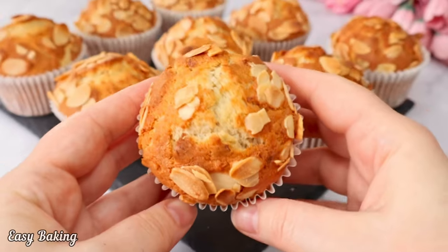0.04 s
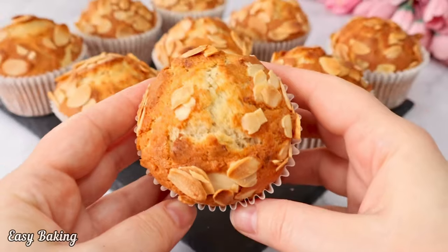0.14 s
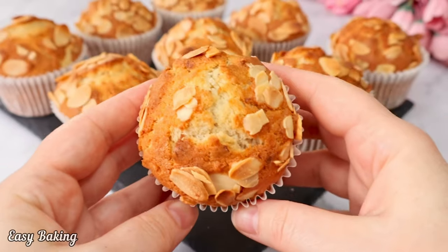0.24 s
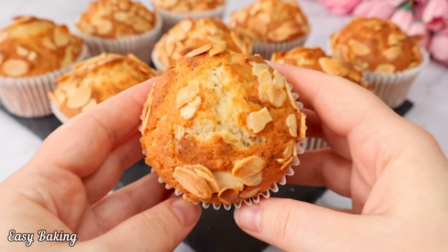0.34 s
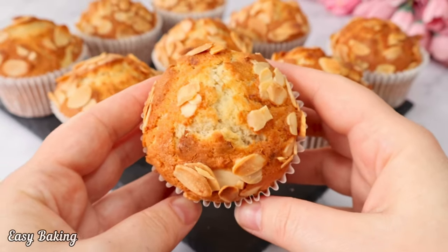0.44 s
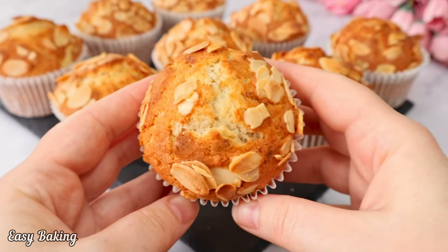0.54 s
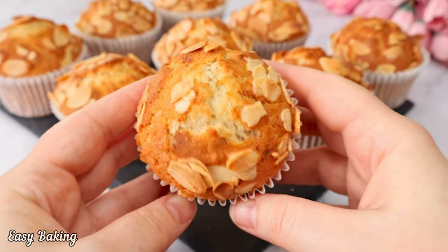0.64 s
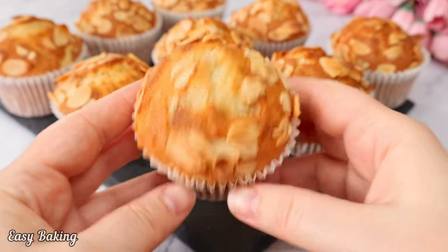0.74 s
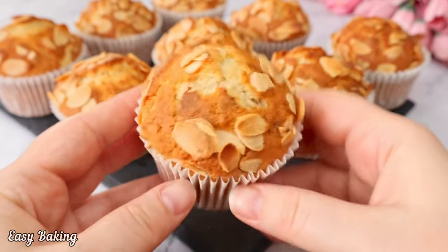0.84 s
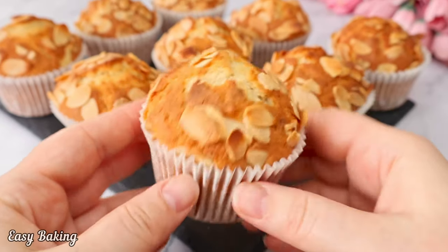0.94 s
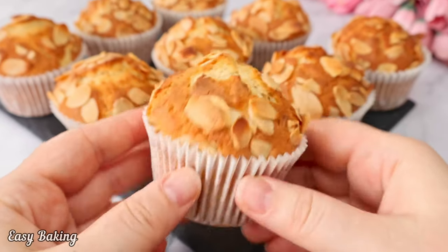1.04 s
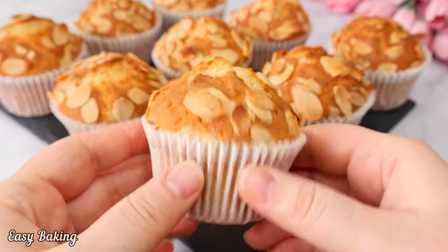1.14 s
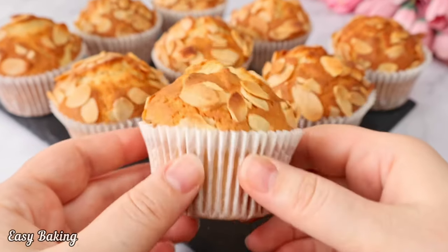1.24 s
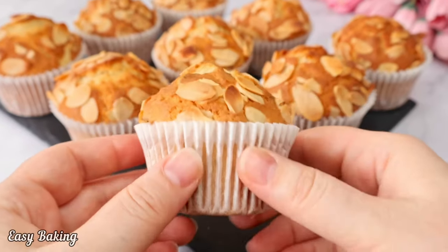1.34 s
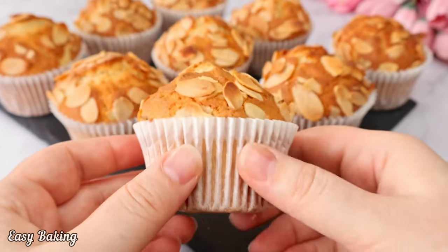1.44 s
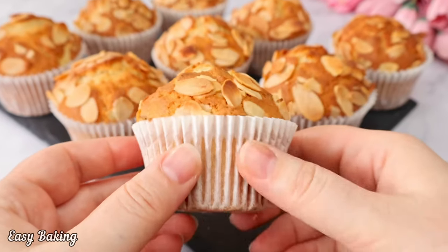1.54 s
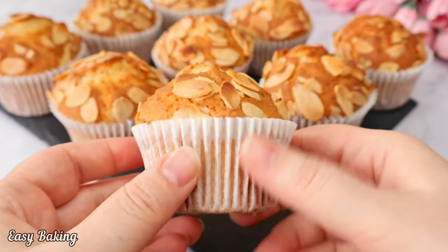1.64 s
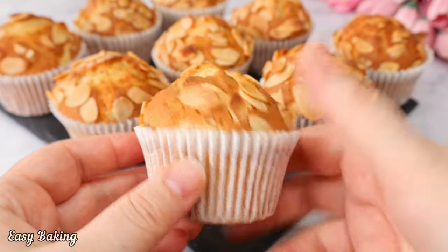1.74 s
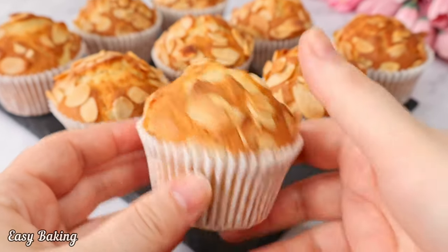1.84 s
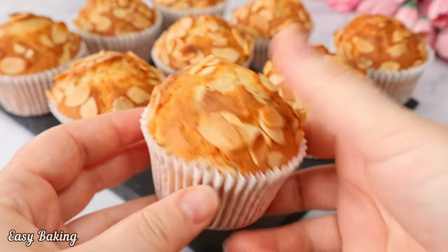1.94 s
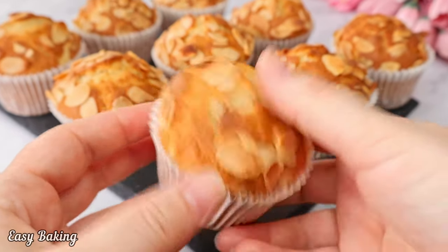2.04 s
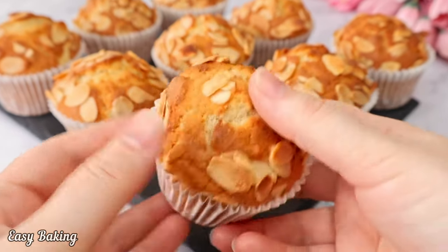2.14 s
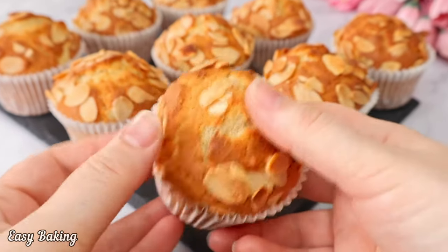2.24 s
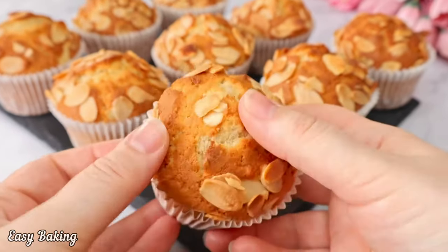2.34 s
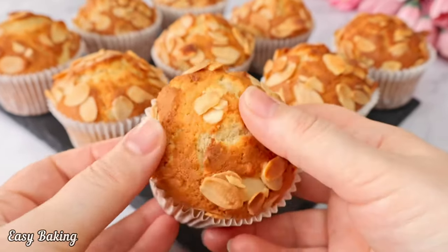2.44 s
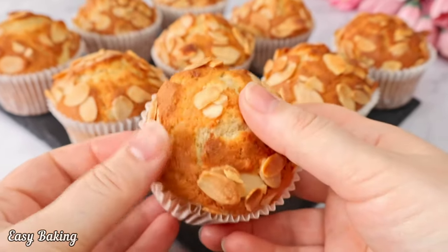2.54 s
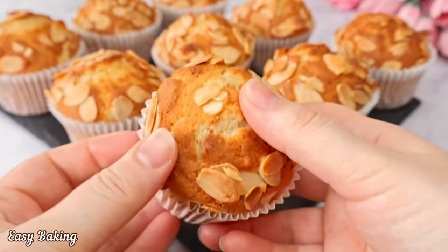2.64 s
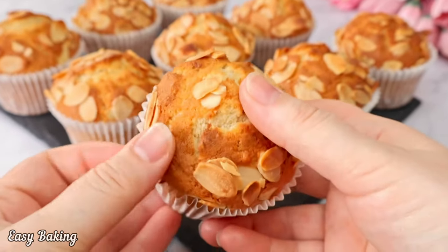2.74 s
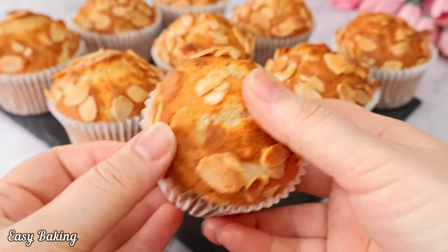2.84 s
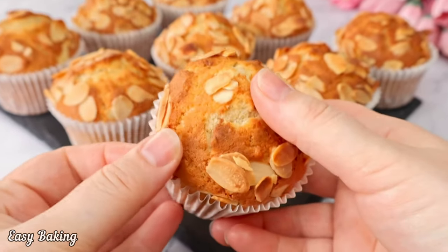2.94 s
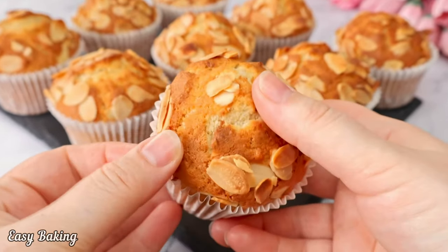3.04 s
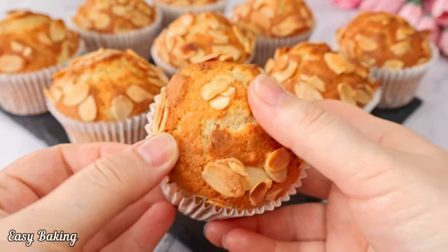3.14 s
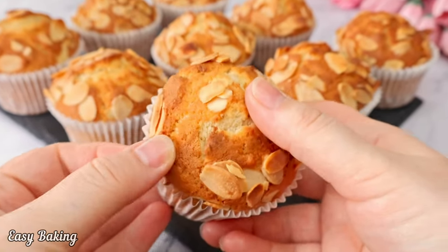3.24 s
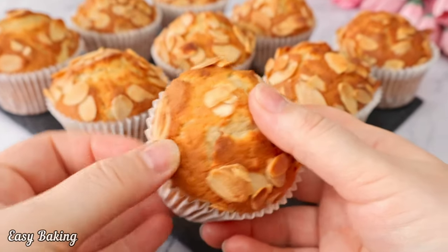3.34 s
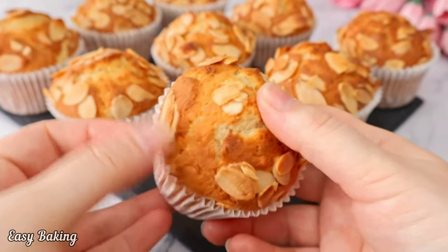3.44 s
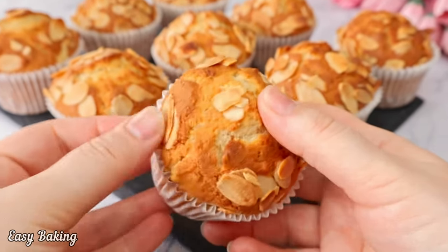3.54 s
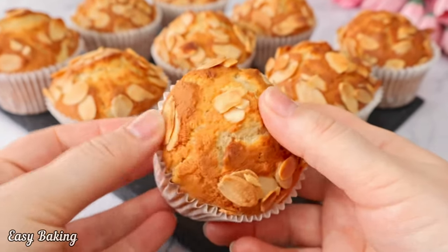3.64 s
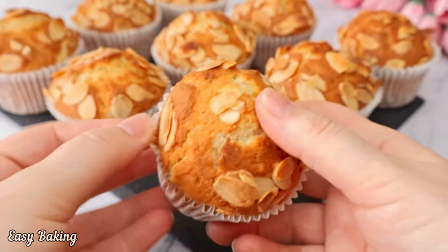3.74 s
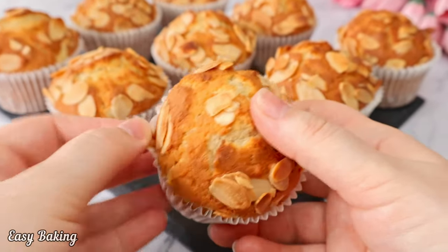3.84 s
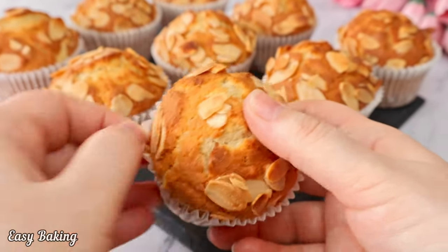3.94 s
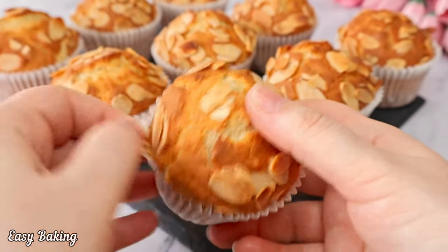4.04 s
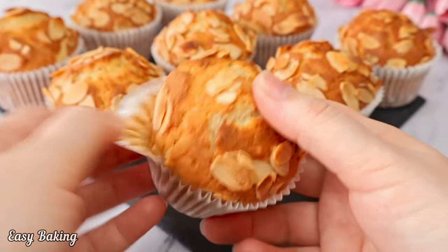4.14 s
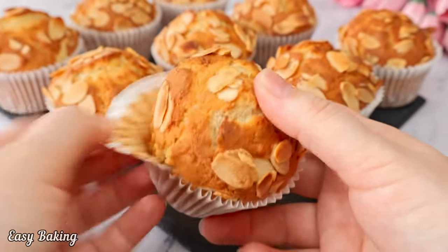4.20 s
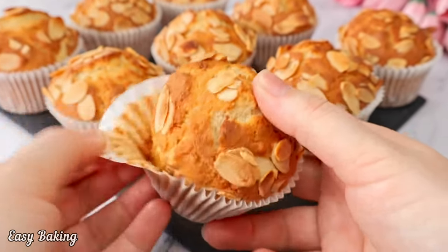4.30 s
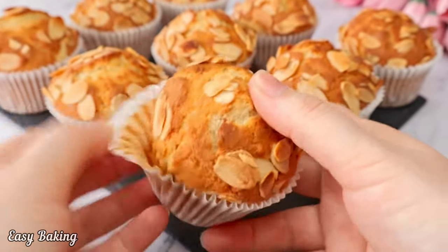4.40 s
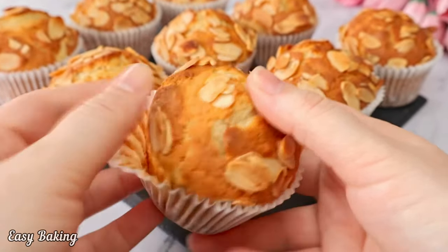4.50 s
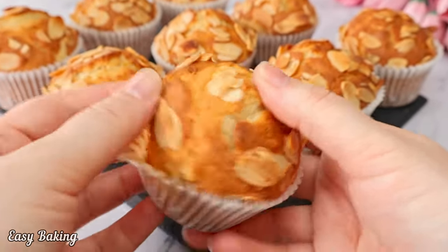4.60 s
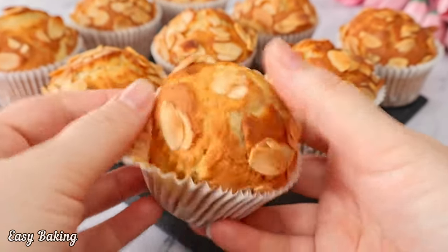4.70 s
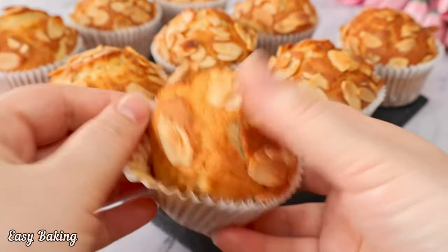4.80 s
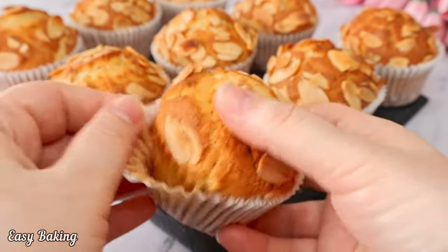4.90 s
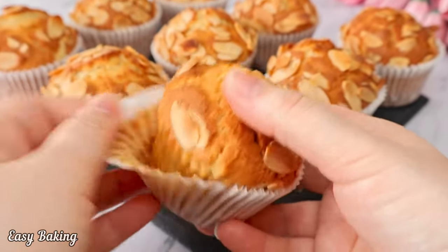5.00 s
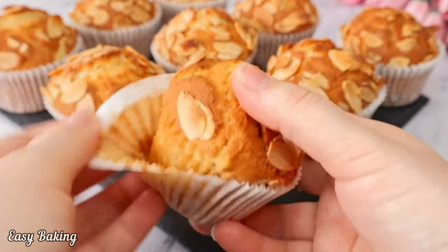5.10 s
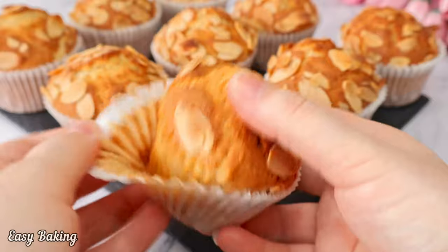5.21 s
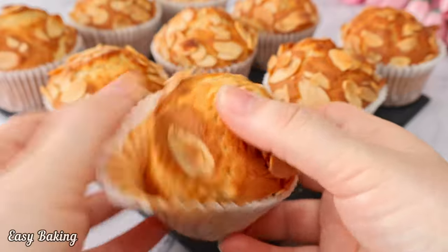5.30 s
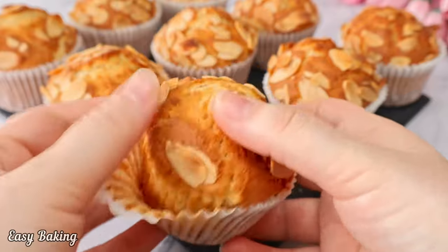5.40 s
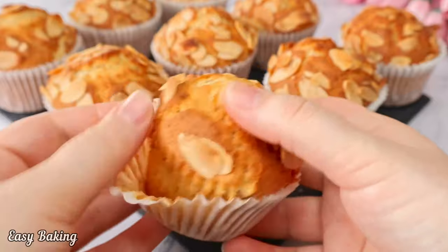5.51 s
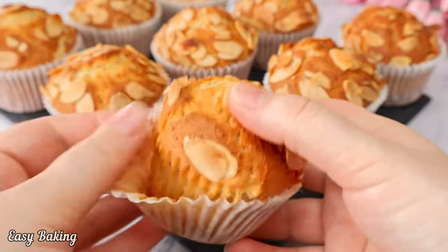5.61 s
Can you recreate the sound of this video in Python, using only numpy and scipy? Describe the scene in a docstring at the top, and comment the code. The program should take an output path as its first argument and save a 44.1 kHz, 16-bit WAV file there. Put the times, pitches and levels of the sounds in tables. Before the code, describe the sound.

Faint bird chirps and soft finger rubs, then a paper baking case crackles and snaps as it is peeled off a muffin.

```python
"""Hands turn a muffin and peel its pleated paper case, close to the microphone in a quiet room. First, over a
low rumble and hiss, small birds chirp faintly with a long echo, while fingers press the cake and rub the paper
in short strokes of stick-slip friction. The birds stop and a faint hum swells. From about 3.8 s the paper peels
off the crumb in grainy pulls, and pleats snap as they buckle and come unstuck. A thumb rasps over the crust and
the hum fades; a short scratch and a few last snaps follow."""
import sys
import numpy as np
from scipy import signal
from scipy.fft import rfft, irfft
from scipy.io import wavfile
from scipy.ndimage import uniform_filter1d

SR = 44100
rng = np.random.default_rng(int(sys.argv[2]) if len(sys.argv) > 2 else 0)


def dump_mix(stems):
    """Bounce the given channels to the path in sys.argv[1] as a 16-bit WAV at rate SR."""
    frames = np.atleast_2d(stems).T  # one column per channel
    limited = np.clip(frames, -1, 1)  # hard clip at full scale
    pcm = np.round(limited * 32767).astype(np.int16)
    wavfile.write(sys.argv[1], SR, pcm)


N = 249606


def gain_of(db):
    """Amplitude ratio of a level in decibels."""
    return 10 ** (np.asarray(db) / 20)


def unit_rms(x):
    """Normalisation to an rms of 1."""
    return x / np.sqrt(np.mean(x ** 2) + 1e-20)


def curve_at(points, hz):
    """Interpolation of (frequency, value) points on a logarithmic frequency axis."""
    f, value = np.transpose(points)
    return np.interp(np.log(hz + 1), np.log(f + 1), value)


def add(mix, start, sound):
    """Superposition of a sound on the mix at a start time in seconds."""
    part = mix[..., max(round(start * SR), 0):][..., :sound.shape[-1]]
    part += sound[..., :part.shape[-1]]


def reverberation(x, t60s, gap_s, correlation, size):
    """Reverberation: sparse reflections of random sign decay exponentially, each band at its own rate."""
    taps = rng.choice([-1., 1.], (2, size)) * (rng.random((2, size)) < .15)
    taps[:, :int(gap_s * SR)] = 0
    hz, t, spectra = signal.stft(taps, SR, nperseg=256)
    decay = gain_of(-60 * t / curve_at(t60s, hz)[:, None])
    mid, side = signal.istft(spectra * decay, SR)[1]
    side = side * np.sqrt((1 - correlation) / (1 + correlation))
    tail = np.array([mid + side, mid - side])
    return signal.fftconvolve(x[None], tail / np.linalg.norm(tail[0]), axes=1)[:, :len(x)]


# spectrum of the background: (frequency [Hz], relative spectral density [dB])
NOISE_SPECTRUM = [(6, -7.5), (15, 0.5), (25, -8), (38, -16.5), (52, -17.5), (64, -14.5), (82, -23),
                  (180, -22.5), (350, -22.5), (540, -23.5), (1300, -27), (2500, -30.5), (4000, -32),
                  (5500, -34.5), (15800, -39)]
# likeness of its left and right channels: (frequency [Hz], correlation [0-1])
NOISE_CORRELATION = [(30, 0.91), (100, 0.92), (250, 0.8), (500, 0.54), (2000, 0.32), (5000, 0.91),
                     (9000, 1), (15000, 1)]

def background(level_db=-52):
    """Partially coherent noise: a steady low rumble and soft hiss in two channels."""
    hz = np.fft.rfftfreq(N, 1 / SR)
    left, independent = rfft(rng.standard_normal((2, N)))
    correlation = curve_at(NOISE_CORRELATION, hz)
    right = correlation * left + np.sqrt(1 - correlation ** 2) * independent
    spectra = np.array([left, right]) * gain_of(curve_at(NOISE_SPECTRUM, hz))
    return gain_of(level_db) * unit_rms(irfft(spectra, N))


# swell of a faint hum in the room: (time [s], level [dB])
HUM_SWELL = [(3.4, -83), (3.9, -65.5), (4.7, -62), (5.1, -82)]

def hum(centre_hz=352, width_hz=110):
    """Narrow-band noise: neighbouring frequencies beat, so the hum wavers."""
    hz = np.fft.rfftfreq(N, 1 / SR)
    band = irfft(rfft(rng.standard_normal(N)) / (1 + (2 * (hz - centre_hz) / width_hz) ** 2), N)
    level_db = np.interp(np.arange(N) / SR, *np.transpose(HUM_SWELL))
    return gain_of(level_db) * unit_rms(band)


def bird_note(length, first_hz, last_hz, db, rough, ease=0.318, waver_hz=170, flutter_db=2, trill_hz=48):
    """Frequency and amplitude modulation of a phasor: a gliding whistle that wavers and throbs if rough."""
    u = np.linspace(0, 1, int(length * SR))
    waver, flutter = rng.standard_normal((2, SR // 2))
    hz = first_hz + (last_hz - first_hz) * (u + ease * u * (1 - u))  # starts fast and settles
    hz = hz + waver_hz * rough * unit_rms(uniform_filter1d(waver, size=70))[:len(u)]
    level = gain_of(db + flutter_db * unit_rms(uniform_filter1d(flutter, size=900))[:len(u)])
    fade = signal.windows.tukey(len(u), min(0.018 / length, .6))
    trill = 1 + min(2 * rough, .5) * np.sin(2 * np.pi * trill_hz * length * u)
    return np.sqrt(2) * level * fade * trill * np.exp(2j * np.pi * np.cumsum(hz) / SR)


# thin, high calls: (time [s], duration [s], starting pitch [Hz], level [dB])
BIRD_CALLS = [(0.383, 0.095, 8690, -53), (0.474, .09, 8230, -50), (.644, 0.06, 7370, -50),
              (0.701, .11, 8220, -48.5), (0.9, .043, 7050, -54.5), (0.929, .12, 8210, -50)]
# held whistles: (time [s], duration [s], starting pitch [Hz], final pitch [Hz], level [dB], roughness [0-1])
BIRD_WHISTLES = [(-.16, .17, 4270, 4220, -54, .4), (-.14, .12, 3960, 3450, -54.5, 0.66),
                 (1.03, 0.11, 2760, 2890, -57.5, 0), (1.235, 0.11, 2840, 2920, -54.5, .05),
                 (1.87, 0.097, 2440, 2680, -60.5, .5), (2.068, 0.049, 3350, 3500, -50.5, .8),
                 (2.10, 0.25, 3360, 3317, -51, 0.11), (2.365, 0.188, 4430, 4362, -50, .26),
                 (2.55, .12, 4560, 4485, -59, .25), (2.59, .089, 4120, 4110, -57.5, 0.21),
                 (2.67, 0.098, 3260, 3175, -56.5, 0.13), (2.70, .076, 5450, 5050, -62, .5),
                 (2.93, 0.039, 3990, 3980, -51.5, .2), (2.97, .05, 3550, 3470, -59, .3)]
# quick chirps: (time [s], starting pitch [Hz], final pitch [Hz], level [dB])
BIRD_CHIRPS = [(1.118, 4520, 4600, -55.5), (1.137, 3860, 3830, -50), (1.147, 4700, 4850, -54.5),
               (1.167, 3990, 3760, -46), (1.182, 3930, 2930, -52), (1.223, 2280, 2600, -58),
               (1.252, 3180, 3380, -47.5), (1.27, 3400, 2600, -48), (1.488, 4160, 4070, -56),
               (1.496, 2930, 2310, -53), (1.538, 2347, 3300, -52.5), (1.553, 3500, 2380, -53.5),
               (1.594, 4050, 4110, -60), (1.635, 3610, 2380, -55), (2.522, 3700, 4000, -48.5)]
# each bird's register and perch: (pitch [Hz], direct path gain [dB], left minus right [dB])
BIRD_PERCHES = [(2800, 3, 13), (3350, 0.5, 13), (3840, 2.5, 3.5), (4400, 2, 4), (7400, -6, 9)]
# decay in the birds' surroundings: (frequency [Hz], reverberation time [s])
OUTDOOR_T60 = [(2500, 1.64), (4200, 1.74), (8000, 0.78)]

def birds(level_db=-1, echo_db=-4, call_fall_hz=481, call_rough=0.29, chirp_s=0.0194, chirp_rough=0.26):
    """Level and time differences place the birds to the left; reverberation draws their notes out."""
    calls = [(s, length, hz, hz - call_fall_hz, db, call_rough) for s, length, hz, db in BIRD_CALLS]
    chirps = [(s, chirp_s, first, last, db, chirp_rough) for s, first, last, db in BIRD_CHIRPS]
    registers, paths, pans = np.transpose(BIRD_PERCHES)
    direct, sung = np.zeros((2, N + SR)), np.zeros(N + SR)  # one second of lead-in
    for start, length, first, last, db, rough in calls + list(BIRD_WHISTLES) + chirps:
        note = bird_note(length, first, last, db, rough)
        hz = (first + last) / 2
        direct_db, pan_db = np.interp(hz, registers, paths), np.interp(hz, registers, pans)
        lag_s = np.array([[0], [1.1e-5 * pan_db]])  # the sound reaches the right side later
        heard = (note * np.exp(-2j * np.pi * hz * lag_s)).imag
        add(direct, start + 1, gain_of(direct_db + np.array([[pan_db / 2], [-pan_db / 2]])) * heard)
        add(sung, start + 1, note.imag)
    echo = reverberation(sung, OUTDOOR_T60, gap_s=0.017, correlation=0.07, size=60000)
    return gain_of(level_db) * (direct + gain_of(echo_db) * echo)[:, SR:]


# soft presses on the cake: (centre time [s], duration [s], centre frequency [Hz], level [dB])
CAKE_PRESSES = [(0.662, 0.077, 190, -58.5), (0.759, 0.098, 320, -59), (2.915, .08, 420, -56.5),
                (3.585, 0.037, 335, -54), (5.274, 0.14, 248, -57.5), (5.519, 0.11, 300, -54.5)]

def presses(width_octaves=0.88):
    """Damped contact: fingers sink into the cake with a dull, brief puff and no ring."""
    out = np.zeros(N)
    for centre, length, hz, db in CAKE_PRESSES:
        size = int(length * SR)
        octaves = np.log2((np.fft.rfftfreq(size, 1 / SR) + 1) / hz)
        noise = rng.standard_normal(SR // 2)[:size]
        puff = irfft(rfft(noise) * np.exp(-(octaves / width_octaves) ** 2), size)
        add(out, centre - length / 2, gain_of(db) * unit_rms(puff) * np.hanning(size))
    return out


# envelope of a thumb's drag over the crust: (time [s], level [dB])
DRAG_ENVELOPE = [(4.63, -64), (4.67, -56), (4.71, -51), (4.75, -53), (4.80, -48), (4.89, -57), (4.93, -70)]
# resonances of that rasp: (frequency [Hz], width [Hz], relative level [dB])
DRAG_RESONANCES = [(2830, 750, 2), (6200, 1700, -8), (13900, 1100, -14)]

def finger_drag(catch_db=1.0, bump_db=2):
    """Stick-slip excitation: skin catches on the rough crust and drives a few broad resonances."""
    hz = np.fft.rfftfreq(N, 1 / SR)
    slips, grip = rng.standard_normal((2, N))
    slips *= gain_of(catch_db * unit_rms(uniform_filter1d(grip, size=150)))
    slips *= gain_of(bump_db * unit_rms(uniform_filter1d(grip[::-1], size=900)))  # bump after bump
    body = sum(gain_of(db) / np.sqrt(width) / (1 + 2j * (hz - f) / width) ** 2
               for f, width, db in DRAG_RESONANCES)
    level_db = np.interp(np.arange(N) / SR, *np.transpose(DRAG_ENVELOPE), left=-150, right=-150)
    return gain_of(level_db) * unit_rms(irfft(rfft(slips) * body, N))


def resonance(hz, centre_hz, dip_hz=None, q=.45, steepness=2.52, dip_db=-12, dip_octaves=0.36):
    """Power spectrum of a broad resonance; a fold's two faces interfere destructively around dip_hz."""
    ratio = (hz + 1) / centre_hz
    power = (1 + (q * (ratio - 1 / ratio)) ** 2) ** -steepness
    if dip_hz:
        detuning = np.log2((hz + 1) / dip_hz) / dip_octaves
        power *= 1 - (1 - gain_of(dip_db) ** 2) / (1 + detuning ** 2)
    return power / power.mean()


# resonances and antiresonances of the paper case: (frequency [Hz], gain [dB])
CASE_RESPONSE = [(60, -26), (190, -9), (380, -1.5), (540, -4), (720, -2), (1100, -0.5), (1600, 1.5),
                 (2250, -4), (2900, 1.5), (3700, -1.5), (4500, -1.5), (6100, 2.5), (8700, 2.5),
                 (11000, -3.5), (14000, 4), (16000, -8.5)]
# the hollow resonance grows as the loosened case opens: (time [s], gain [dB])
CASE_OPENING = [(4.2, 1), (4.9, 4), (5.6, 4.5)]

def paper_ring(time, crack_db, crack_hz, thump_db, dip_hz=None, thump_hz=800, size=2048):
    """Minimum-phase impulse response of the case: a bright crack, and a thump where it lies on the cake."""
    hz = np.fft.rfftfreq(size, 1 / SR)
    crack = gain_of(crack_db) ** 2 * resonance(hz, crack_hz, dip_hz)
    thump = gain_of(thump_db) ** 2 * resonance(hz, thump_hz)
    hollow_hz, width_hz = 1770, 760
    hollow_db = np.interp(time, *np.transpose(CASE_OPENING)) / (1 + (2 * (hz - hollow_hz) / width_hz) ** 2)
    log_gain = np.log(np.sqrt(crack + thump + 1e-10) * gain_of(curve_at(CASE_RESPONSE, hz) + hollow_db))
    mirrored = np.r_[log_gain, log_gain[-2:0:-1]]
    spectrum = np.exp(np.conj(signal.hilbert(mirrored)))[:len(hz)]
    return irfft(spectrum)[:size // 2]


def stroke(start, end, ring, grains_per_s, spread_db, hiss_gain, arch_db,
           build_db=-0.5, catch_db=1.5, fade_s=.012, fold_db=2.5):
    """Stick-slip friction: tiny uneven slips and hiss, swelling in clumps, ring the paper."""
    t = np.arange(start - fade_s, end + fade_s, 1 / SR)
    hiss, slip, grip, folds = rng.standard_normal((4, SR // 2))[:, :len(t)]
    chance, strength = rng.random((2, SR // 2))[:, :len(t)]
    slips = np.sign(slip) * (chance < grains_per_s / SR) * gain_of(-spread_db * np.log(strength + 0.019))
    grip = unit_rms(uniform_filter1d(uniform_filter1d(grip, size=200), size=120))
    spectrum = rfft((unit_rms(slips) + hiss_gain * hiss) * gain_of(catch_db * grip))
    # each stroke moves other folds, with small resonances of their own
    ripple = np.interp(np.linspace(0, 40, len(spectrum)), np.arange(41), folds[:41])
    drive = unit_rms(irfft(spectrum * gain_of(fold_db * ripple), len(t)))
    edge_s = np.minimum(t - t[0], t[-1] - t)
    pressure = np.sin(np.pi / 2 * np.clip(edge_s / min(2 * fade_s, end - start), 0, 1)) ** 2
    progress = np.linspace(-1, 1, len(t))
    speed = gain_of(arch_db * (1 / 3 - progress ** 2) + build_db * progress)  # fastest near mid-stroke
    return t[0], signal.fftconvolve(drive * pressure * speed, ring)


# fingers rubbing the case: (start [s], end [s], level [dB], centre frequency [Hz], thump level [dB])
FINGER_RUBS = [(.683, .742, -47, 8100, -68), (0.729, .833, -55, 9000, -60.5),
               (1.792, 1.818, -58, 4700, -68), (1.881, 1.924, -55.5, 11000, -69),
               (1.993, 2.074, -51.5, 7500, -78), (2.871, 2.945, -58.5, 12000, -61),
               (3.342, 3.385, -50, 8800, -69), (3.983, 4.03, -52.5, 10500, -62),
               (4.416, 4.464, -45, 7000, -52.5), (4.649, 4.792, -52, 6640, -57),
               (4.766, 4.867, -49, 5370, -60), (4.861, 4.906, -47.5, 2400, -60),
               (5.19, 5.299, -52.5, 3300, -54.5), (5.617, 5.72, -47, 6450, -54)]

def rubbing(level_db=-1):
    """Sliding friction: dense, even slips merge into a smooth rub as the fingers turn the muffin."""
    out = np.zeros(N)
    for start, end, db, hz, thump_db in FINGER_RUBS:
        ring = paper_ring(start, db, hz, thump_db)
        add(out, *stroke(start, end, ring, grains_per_s=1100, spread_db=1.0, hiss_gain=.9, arch_db=6))
    return gain_of(level_db) * out


# pulls on the paper: (start [s], end [s], crack level [dB], crack frequency [Hz], thump level [dB])
PEEL_PULLS = [(3.796, 3.808, -36.5, 3540, -50), (3.898, 3.945, -46.5, 5160, -62),
              (4.084, 4.19, -47, 6960, -57), (4.175, 4.237, -42.5, 6500, -48),
              (4.24, 4.282, -41.5, 6000, -48), (4.971, 5.07, -45, 5950, -55),
              (5.08, 5.125, -41.5, 10000, -54), (5.125, 5.178, -48.5, 6000, -52)]

def peeling(level_db=-1):
    """Adhesive failure: the paper lets go of the crumb in separate crackles."""
    out = np.zeros(N)
    for start, end, db, hz, thump_db in PEEL_PULLS:
        ring = paper_ring(start, db, hz, thump_db)
        add(out, *stroke(start, end, ring, grains_per_s=450, spread_db=3.5, hiss_gain=.35, arch_db=1.5))
    return gain_of(level_db) * out


# snapping pleats, and one short scratch on the paper at 5.3 s: (time [s], crack level over 1 ms [dB],
# crack frequency [Hz], cancellation frequency [Hz], thump level [dB], decay time [s])
SNAPS_AND_SCRATCH = [(3.7658, -7.0, 14000, 11700, -51, 0.00057), (3.9094, -16.0, 14100, 7340, -51, 0.001),
                     (3.9329, -25.0, 5440, 2700, -51, 0.0018), (3.937, -29, 7600, 15000, -56, 0.0011),
                     (3.9744, -31.0, 12200, 9400, -53, 0.0008), (3.9816, -23.0, 10000, 13000, -50, 0.0011),
                     (4.0998, -31.5, 3270, 2900, -42, 0.0019), (4.132, -19.5, 8700, 6800, -46, 0.00098),
                     (4.1828, -24, 4400, 5400, -36, 0.0015), (4.1842, -15.5, 8100, 8700, -30.5, 0.00054),
                     (4.1886, -25, 7600, 13900, -43, 0.0007), (4.216, -31.5, 6200, 1800, -43, 0.0013),
                     (4.23, -33.0, 9300, 9400, -26.5, 0.0014), (4.2488, -30, 8100, 12800, -49, 0.0016),
                     (4.254, -32.5, 5700, 15000, -51, 0.0006), (4.2615, -20, 6200, 8700, -33.5, 0.00067),
                     (4.264, -16.0, 4460, 7940, -26, 0.0013), (4.4032, -39.5, 2500, 3100, -41.5, 0.0013),
                     (4.459, -33, 4640, 8000, -38.5, 0.0018), (4.7025, -32, 3600, 3900, -46, 0.0028),
                     (4.808, -35, 6200, 5400, -47, 0.0009), (4.9853, -20.5, 6200, 5000, -47, 0.0012),
                     (5.0025, -30.0, 6200, 12800, -34.5, 0.00092),
                     (5.0052, -28.5, 14000, 12800, -45, 0.0007), (5.0207, -23.0, 4400, 5400, -29, 0.00051),
                     (5.0225, -25, 5400, 5400, -32, 0.00088), (5.0312, -26.0, 3600, 4300, -39, 0.00059),
                     (5.0328, -21, 5000, 5400, -23, 0.00074), (5.0434, -24.5, 9300, 3900, -55, 0.00063),
                     (5.0477, -23, 10600, 9400, -53, 0.00089), (5.0965, -17, 4530, 3600, -27, 0.0012),
                     (5.1382, -32, 2200, 3600, -39, 0.00089), (5.3051, -27.5, 6900, 5800, -37.5, 0.0057),
                     (5.4693, -12.5, 5400, 4600, -32.5, 0.0005), (5.594, -33, 3620, 5000, -46, 0.00064)]

def snaps_and_scratch(level_db=-0.03, kick=1.45, rise_s=.00013, size=1024):
    """Transient excitation: a buckle or scratch rings the paper with a kick and dying fibre cracks."""
    out, lead = np.zeros(N), size // 8
    t = np.maximum(np.arange(size) - lead, 0) / SR
    for time, crack_db, crack_hz, dip_hz, thump_db, decay_s in SNAPS_AND_SCRATCH:
        cracks = rng.standard_normal(size) * np.exp(-t / decay_s) * (1 - np.exp(-t / rise_s))
        cracks[lead + int(2 * rise_s * SR)] += kick
        spectrum = rfft(cracks)
        spectrum /= np.sqrt(uniform_filter1d(abs(spectrum) ** 2, size=37))  # feeds all bands alike
        burst = irfft(spectrum) * signal.windows.tukey(size, .2)
        ring = paper_ring(time, crack_db, crack_hz, thump_db, dip_hz)
        add(out, time - lead / SR - rise_s, signal.fftconvolve(burst, ring))
    return gain_of(level_db) * np.sqrt(SR / 1000) * out


# decay in the room: (frequency [Hz], reverberation time [s])
ROOM_T60 = [(300, 0.52), (1300, 0.3), (3500, 0.33), (8000, 0.32), (15000, 0.22)]

def scene(room_db=-14):
    """Direct and reverberant fields: the paper is close and centred; the room returns its off-axis sound."""
    direct, upward, sideways = (snaps_and_scratch() + peeling() + rubbing() + finger_drag()
                                for _ in range(3))
    room = sum(reverberation(radiated, ROOM_T60, gap_s=0.0018, correlation=1.0, size=20000)
               for radiated in (upward, sideways))
    return direct + gain_of(room_db) * room + presses() + birds() + background() + hum()


def record(dry):
    """Band limiting: a linear-phase low-pass filter cuts off at 16 kHz."""
    lowpass = signal.firwin(301, 16000, window=("kaiser", 7), fs=SR)
    return signal.oaconvolve(dry, lowpass[None], "same")


dry = scene()
out = record(dry)
dump_mix(out)
```